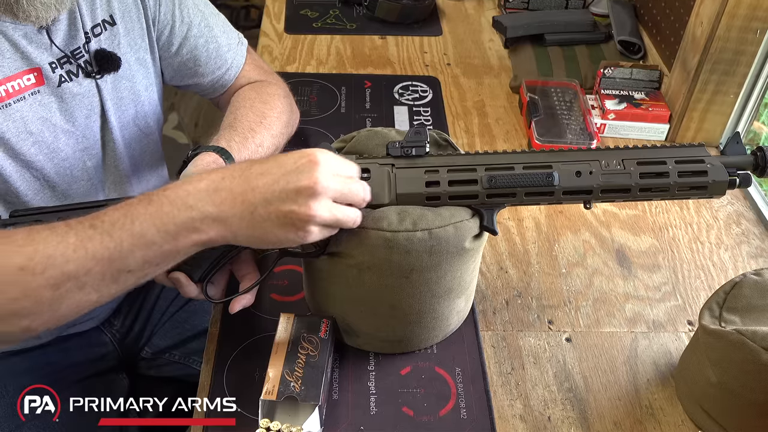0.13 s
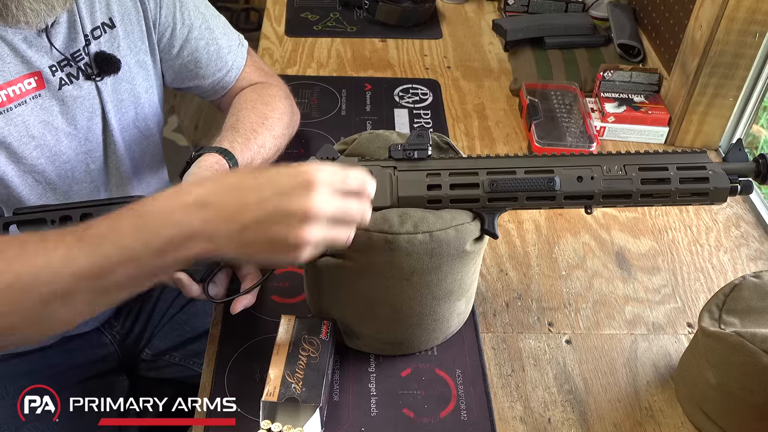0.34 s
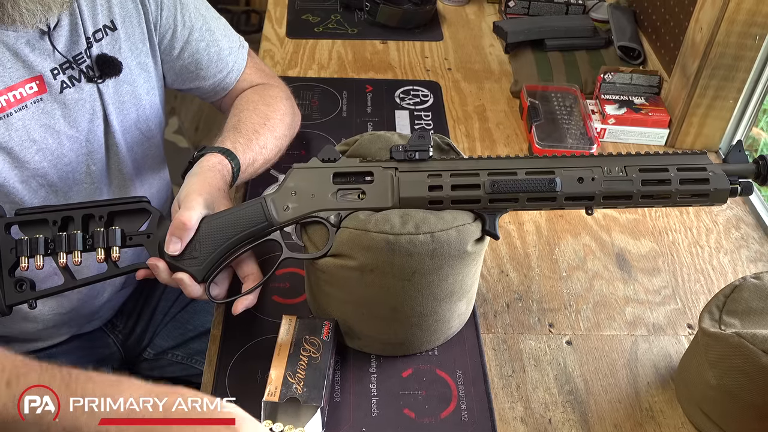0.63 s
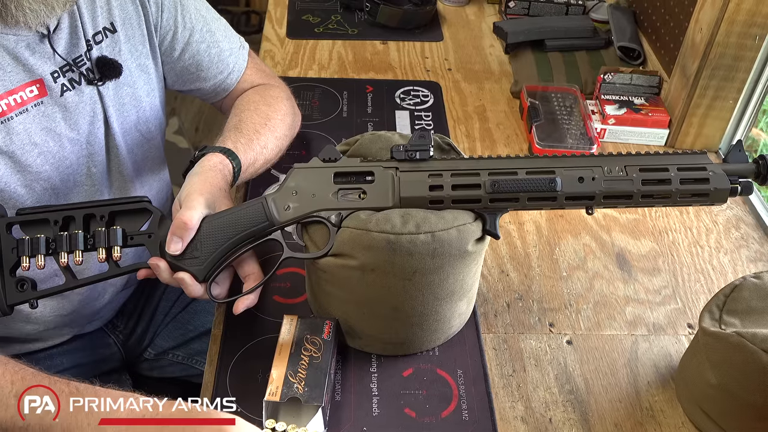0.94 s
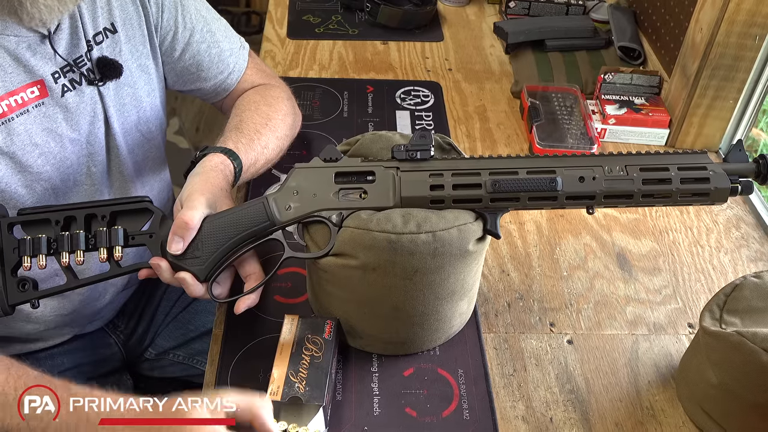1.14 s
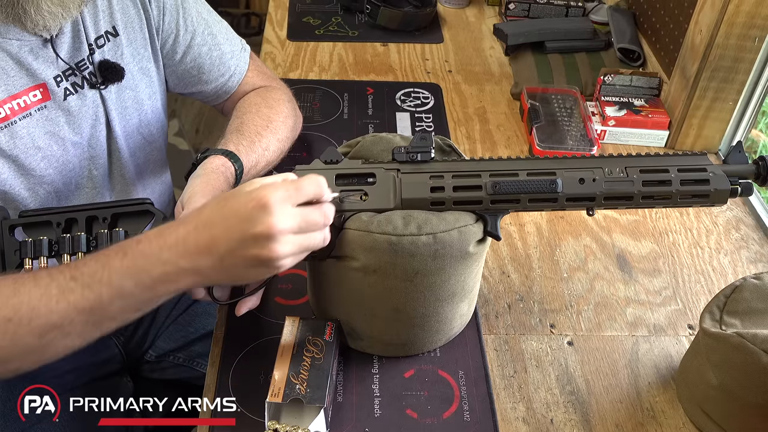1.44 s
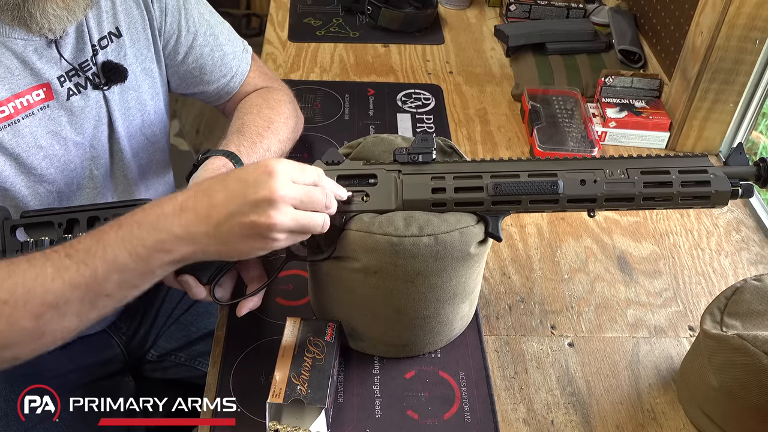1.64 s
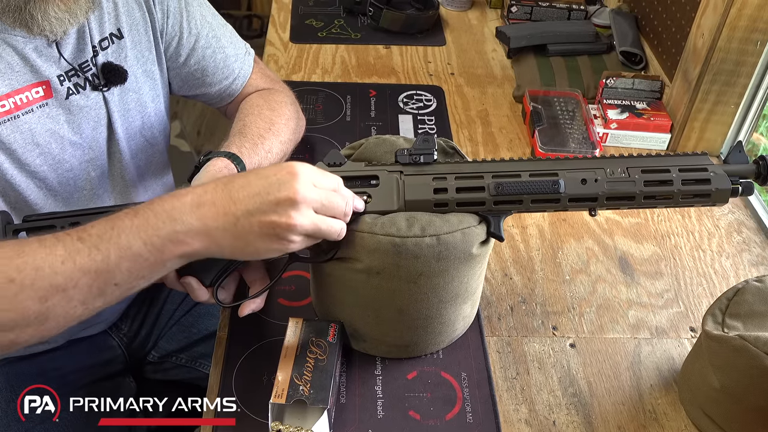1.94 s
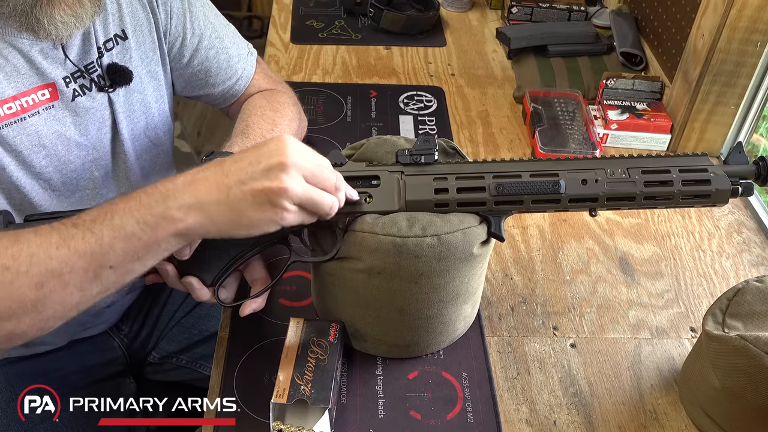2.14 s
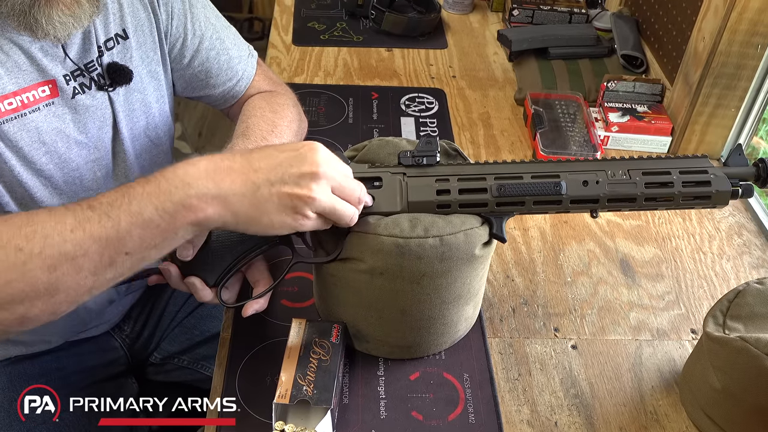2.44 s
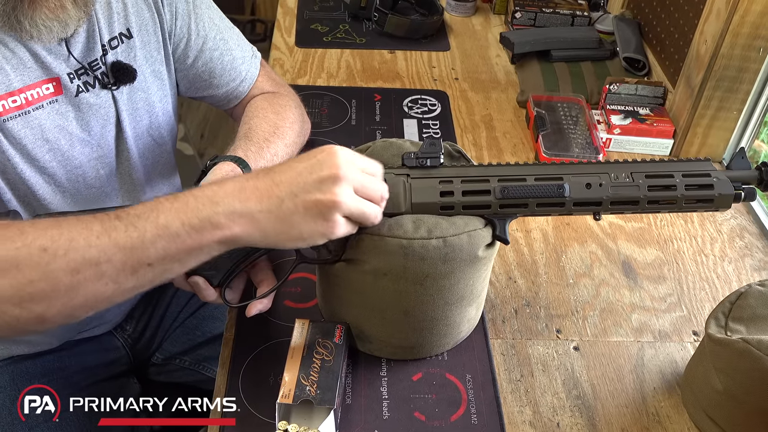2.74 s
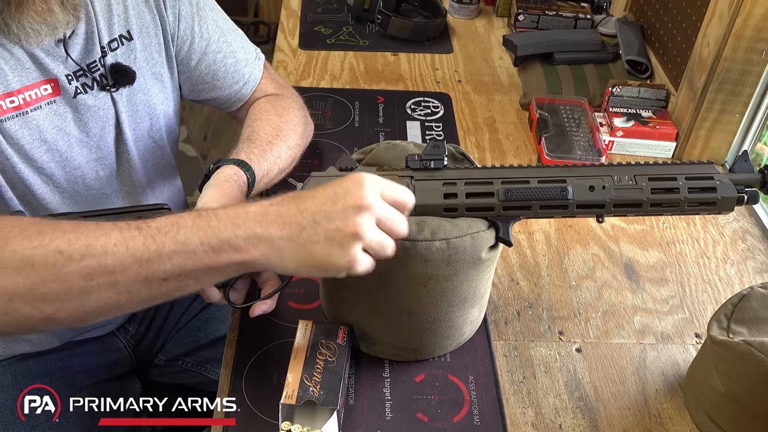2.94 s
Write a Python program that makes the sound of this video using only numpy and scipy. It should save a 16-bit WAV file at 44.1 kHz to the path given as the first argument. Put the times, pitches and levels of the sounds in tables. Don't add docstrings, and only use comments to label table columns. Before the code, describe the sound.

Sharp metallic clicks of cartridges being pushed into a rifle, with light scrapes and box rattles.

```python
import sys
import numpy as np
from scipy import signal
from scipy.fft import rfft, irfft, next_fast_len
from scipy.io import wavfile
from scipy.ndimage import uniform_filter1d, map_coordinates

SR = 44100
rng = np.random.default_rng(int(sys.argv[2]) if len(sys.argv) > 2 else 0)


def output_pcm(signal):
    pcm = np.clip(np.atleast_2d(signal).T, -1, 1) * 32767
    wavfile.write(sys.argv[1], SR, np.round(pcm).astype(np.int16))


def attenuation_scalar(level_db):
    decades = np.asarray(level_db, float) / 20
    return 10 ** decades


N = 136710


def unit(x):
    return x / np.sqrt(np.mean(x ** 2) + 1e-20)


def along(points, hz):
    f, v = np.transpose(points)
    return np.interp(np.log(hz + 1), np.log(f + 1), v)


def wobble(rate):
    knots = rng.standard_normal(int(N * rate / SR) + 4)
    return map_coordinates(knots, [np.arange(N) * rate / SR])


def filtered(x, response):
    m = next_fast_len(len(x) + 8192)
    return irfft(rfft(x, m) * response(np.fft.rfftfreq(m, 1 / SR)), m)[:len(x)]


def body(modes):
    def response(f):
        total = 0
        for k, (hz, width, db) in enumerate(modes):
            total = total + (-1) ** k * attenuation_scalar(db) * 1j * f * width / (hz * hz - f * f + 1j * f * width)
        return total
    return response


def add(track, s, sound):
    part = track[round(s * SR):][:len(sound)]
    part += sound[:len(part)]


def ring(t, hz, t60, rise):
    return np.sin(2 * np.pi * hz * t) * attenuation_scalar(-60 * t / t60) * (1 - np.exp(-t / rise))


def slips(count):
    rate_per_s, spread_db = 2500, 3.5
    happens, sign, size = rng.random((3, count))
    return (happens < rate_per_s / SR) * np.sign(sign - 0.5) * attenuation_scalar(-spread_db * np.log(size + 0.03))


def burst(t, t60, response):
    noise = rng.standard_normal(len(t)) + slips(len(t))
    envelope = attenuation_scalar(-60 * t / max(t60, 0.004)) * (1 - np.exp(-t / 0.00067))
    return filtered(noise * envelope, response) / np.std(filtered(noise, response))


def in_shed(sound):
    # frequency in Hz, t60 in seconds.
    wall_decay = [(200, 0.17), (4000, 0.24), (16000, 0.21)]
    wall_db, delay_s = -7, 0.003
    hz, t, z = signal.stft(rng.standard_normal(SR // 4), SR, nperseg=256)
    tail = signal.istft(z * attenuation_scalar(-60 * t / along(wall_decay, hz)[:, None]), SR, nperseg=256)[1]
    delayed = np.pad(sound, (round(delay_s * SR), 0))
    wet = signal.fftconvolve(delayed, attenuation_scalar(wall_db) * tail / np.linalg.norm(tail))
    return wet + np.pad(sound, (0, len(wet) - len(sound)))


def clicks(rows, low, high):
    ring_cycles, rise_cycles = 8, 0.6
    rattle_db, treble_offset_db, treble_faster, dull_hz = -7, -1.5, 0.44, 5100
    brush_db, brush_t60_s = -18.5, 0.007
    out, t = np.zeros(N), np.arange(SR // 8) / SR

    def scatter(modes):
        return [(hz, width, db + rng.normal(0, 2)) for hz, width, db in modes]

    for s, db, hz, treble_db, t60 in rows:
        shell, thin = body(scatter(low)), body(scatter(high))
        tone = 2.17 * ring(t, hz, ring_cycles / hz, rise_cycles / hz)
        rattle = attenuation_scalar(rattle_db) * burst(t, t60, lambda f: shell(f) / (1 + 1j * f / dull_hz))
        treble = attenuation_scalar(treble_db + treble_offset_db) * burst(
            t, t60 * treble_faster, lambda f: thin(f) * 1j * f / dull_hz / (1 + 1j * f / dull_hz) ** 2)
        add(out, s, in_shed(attenuation_scalar(db) * (tone + rattle + treble)))
        brush = burst(t[:SR // 40], brush_t60_s, shell)[::-1]
        add(out, s - 1 / 40, attenuation_scalar(db + brush_db) * brush)
    return out


def rifle():
    # start in seconds, peak in dB, ring in Hz, treble over it
    # in dB, rattle t60 in seconds.
    rifle_clicks = [(0.0408, -40, 2900, -26, 0.02), (0.0603, -38, 3700, -12, 0.02),
                    (0.091, -43.5, 3010, -21, 0.18), (0.133, -39.5, 2840, -40, 0.03),
                    (0.1975, -38, 3000, -25, 0.02), (0.2495, -28.5, 4340, -12, 0.022),
                    (1.5238, -22, 3620, -21, 0.0076), (1.5308, -28.5, 4430, -10.5, 0.057),
                    (1.672, -57, 1930, -26, 0.015), (1.697, -61, 3000, -20, 0.013),
                    (2.183, -58, 2780, -30, 0.068), (1.788, -54, 1390, -27, 0.017),
                    (1.9948, -41.5, 1780, -37, 0.033), (2.1905, -39, 3520, -14, 0.039),
                    (2.398, -35, 1730, -13.5, 0.042), (2.416, -35.5, 2480, -19, 0.029),
                   (2.4664, -34.5, 3700, -47, 0.021), (2.598, -52, 2200, -33, 0.047),
                   (2.614, -50.5, 3680, -12, 0.055), (2.689, -42, 3700, -31, 0.099),
                   (2.714, -30, 3380, -11.5, 0.055), (2.7215, -24.5, 4100, -8, 0.029),
                   (2.729, -33.5, 3000, -7, 0.02), (2.7819, -36.5, 2880, -17, 0.054),
                   (2.975, -52, 1420, -32, 0.084), (3.011, -56, 1320, -32, 0.054)]
    gate_snaps = [
        (0.3294, -36, 2500, -9, 0.075),
        (0.335, -24.5, 1410, 1.5, 0.032),
        (0.3442, -17, 3020, -4, 0.013),
        (0.3489, -24.5, 4370, -12, 0.025),
        (1.9324, -30.5, 1700, -19.5, 0.029),
        (2.386, -58, 2500, -23, 0.12),
        (2.392, -49, 2500, -5.5, 0.1),
        (3.062, -51.5, 5040, -39, 0.16),
    ]
    slide_clicks = [(0.053, -39, 2900, -22, 0.028), (0.0634, -32.5, 4440, -25, 0.014),
                    (.2041, -41.5, 4400, -25, 0.028), (.2126, -34, 4460, -25, .026),
                    (0.2314, -36, 3010, -22, 0.038), (0.2544, -39, 3020, -15, .031),
                    (0.259, -36, 4450, -11, .036), (2.4204, -39.5, 2500, -25, .021),
                    (2.6481, -53, 1490, -30, .021), (2.6571, -55, 1600, -30, .021),
                    (2.6711, -51, 3140, -25, .051), (2.7855, -38, 3000, -21, 0.045),
                    (2.8247, -49, 3000, -12, .031)]
    # frequency in Hz, width in Hz, level in dB.
    rifle_modes = [(537, 306, 2.5), (1320, 246, 7), (1700, 410, 7), (2250, 560, 6.5), (3010, 600, 11.5),
                   (3780, 340, 9), (4270, 250, 10.5), (5280, 460, 4), (6170, 1220, 0)]
    thin_steel_modes = [(7470, 2700, -2.5), (9340, 1700, 0), (11500, 1700, -2.5), (13900, 1900, -20)]
    damped = [(hz, width * 1.11, db) for hz, width, db in rifle_modes]
    return clicks([*rifle_clicks, *gate_snaps, *slide_clicks], damped, thin_steel_modes)


def slide(rows):
    # frequency in Hz, width in Hz, level in dB.
    tube_modes = [(1700, 1100, -4), (2500, 240, 0.5), (3020, 340, -4), (3700, 120, 5), (4340, 320, 0),
                  (6190, 560, -5)]
    skin_modes = [(6800, 640, -10), (10070, 1250, -2.5), (12240, 710, 0.5), (14300, 2900, -11)]
    s, scrape_db, hiss_db = np.transpose(rows)

    def level(db):
        return attenuation_scalar(np.interp(np.arange(N) / SR, s, db, left=-130, right=-130))

    scrape = unit(filtered(slips(N), body(tube_modes)))
    scrape = scrape * attenuation_scalar(3.5 * wobble(60) + 2.5 * wobble(250))
    hiss = unit(filtered(rng.standard_normal(N) + slips(N), body(skin_modes)))
    hiss = hiss * attenuation_scalar(2.5 * wobble(45) + 2 * wobble(200))
    return in_shed(level(scrape_db) * scrape + level(hiss_db + 0.5) * hiss)[:N]


def cartridge_slides():
    # time in seconds, scrape in dB, thumb hiss in dB.
    first_slide = [
        (.05, -63, -82),
        (.057, -55, -61),
        (.11, -62, -65.5),
        (.19, -60.5, -61.5),
        (.205, -51.5, -61),
        (.228, -55, -61),
        (.262, -50.5, -54),
        (.28, -64.5, -74),
        (.325, -69, -80),
    ]
    last_slide = [
        (2.6, -75, -89),
        (2.615, -59.5, -62.5),
        (2.66, -82, -98),
        (2.672, -64.5, -66),
        (2.73, -56.5, -60.5),
        (2.845, -60.5, -64.5),
        (2.87, -60.5, -58.5),
        (2.9, -64.5, -79),
        (2.96, -80, -95),
    ]
    return slide(first_slide) + slide(last_slide)


def pings():
    # start in seconds, peak in dB, pitch in Hz, t60 in seconds.
    ringing_parts = [(.204, -46, 4420, .07), (.2555, -44, 4450, .05), (.335, -29, 7500, .02),
                     (.335, -31, 11300, .018), (.342, -39, 525, .07), (.3435, -28, 1400, .015),
                     (.3435, -26, 4850, .006), (.3472, -29, 3020, .012), (.702, -43, 1850, .025),
                     (.703, -50, 750, .04), (.79, -52, 680, .04), (.822, -58, 8000, .02),
                     (.919, -52, 7600, .03), (.9877, -42, 1890, .03), (1.104, -55, 4200, .02),
                     (1.1465, -42, 900, .03), (1.5262, -40, 3600, .03), (1.531, -33, 1650, .025),
                     (1.531, -37, 9400, .015), (1.532, -39, 540, .07), (1.9328, -39, 1290, .03),
                     (1.9365, -40, 3000, .035), (1.995, -46, 2700, .012), (2.191, -48, 1200, .04),
                     (2.191, -48, 5800, .015), (2.192, -46, 3000, .04), (2.7225, -33, 4300, .03),
                     (2.976, -48, 3500, .005), (3.0635, -50, 4800, .012)]
    out, t = np.zeros(N), np.arange(SR // 16) / SR
    for s, db, hz, t60 in ringing_parts:
        add(out, s, attenuation_scalar(db) * ring(t, hz, t60, 0.00051))
    return out


def gate_spring():
    t = np.arange(SR // 2) / SR
    fade = np.clip((0.115 - t) / 0.04, 0, 1)
    out = np.zeros(N)
    add(out, 2.84, attenuation_scalar(-71 + 1.9 * wobble(90)[:len(t)]) * np.sin(2 * np.pi * 6300 * t) * fade)
    return out


def cartridge_box():
    # start in seconds, peak in dB, ring in Hz, treble over it in dB, rattle t60 in seconds.
    box_clicks = [(0.696, -42.5, 1620, -21, 0.062), (0.702, -35.5, 1600, -29, 0.06),
                  (0.758, -37, 1630, -26, 0.036), (0.79, -44, 686, -35, 0.047),
                  (0.821, -53, 840, -13.5, 0.21), (0.919, -59, 620, 6.5, 0.17),
                  (0.952, -49, 1890, -11, 0.059), (0.971, -47, 1890, -5, 0.022),
                  (1.011, -48.5, 665, 2.5, 0.12), (1.021, -48.5, 704, 3.5, 0.04),
                  (1.028, -42.5, 710, -29, 0.08), (1.105, -46.5, 1880, -13, 0.052),
                  (1.146, -29.5, 1560, -25, 0.043)]
    # frequency in Hz, width in Hz, level in dB.
    box_modes = [(269, 148, -0.5), (763, 340, -5), (1244, 134, -6), (1890, 140, -3), (2900, 1430, -17)]
    brass_modes = [(6800, 8100, -4.5), (11600, 930, 7.5), (13200, 760, -0.5)]
    return clicks(box_clicks, box_modes, brass_modes)


def bench_thumps():
    # start in seconds, peak in dB.
    pushes = [(0.063, -57), (0.131, -57), (0.198, -58.5), (0.252, -61.5), (0.342, -56), (0.706, -60.5),
              (1.933, -50), (2.248, -65.5), (2.396, -54), (2.603, -52.5), (2.672, -56.5), (2.723, -48),
              (2.787, -49), (2.842, -52)]
    # frequency in Hz, level in dB, t60 in seconds.
    bench_modes = [(98.4, 13, 0.21), (149.8, -4, 0.22)]
    thud_db, thud_t60_s, thud_hz = -6.5, 0.2, 257
    out, t = np.zeros(N), np.arange(SR // 2) / SR
    wood = body([(thud_hz, thud_hz, 0)])
    for s, db in pushes:
        add(out, s, sum(attenuation_scalar(db + level) * ring(t, hz, t60, 0.004) for hz, level, t60 in bench_modes))
        add(out, s, attenuation_scalar(db + thud_db) * burst(t, thud_t60_s, lambda f: wood(f) ** 2))
    return out


def knocks():
    # start in seconds, level in dB, pitch in Hz, t60 in seconds.
    struck_parts = [(.347, -52.5, 226, 0.14), (.7091, -64.5, 10900, 0.049), (0.7264, -65.5, 11000, 0.06),
                    (.9421, -59, 10000, 0.037), (.9461, -63, 5300, 0.029), (1.022, -60, 650, 0.07),
                    (1.156, -57.5, 2290, 0.2), (1.1627, -59.5, 8900, 0.071), (1.9312, -44, 3000, 0.025),
                    (2.831, -63.5, 483, 0.45), (3.051, -49, 240, 0.13), (3.056, -57.5, 416, 0.075),
                    (3.0831, -58, 12001, 0.13), (3.0858, -50.5, 5900, 0.052)]
    out, t = np.zeros(N), np.arange(SR // 2) / SR
    for s, db, hz, t60 in struck_parts:
        part = body([(hz, 0.23 * hz, 0)])
        add(out, s, attenuation_scalar(db) * burst(t, t60, lambda f: part(f) ** 2))
    return out


def bird():
    # start in seconds, level in dB, glide in Hz.
    chirps = [
        (.522, -69.5, -250),
        (.645, -83, -150),
        (1.475, -81, 255),
        (1.845, -78, 0),
    ]
    chirp_s, chirp_hz = 0.023, 3800
    out, u = np.zeros(N), np.linspace(0, 1, round(chirp_s * SR))
    for s, db, glide_hz in chirps:
        phase = 2 * np.pi * np.cumsum(chirp_hz + glide_hz * (u - 0.5)) / SR
        add(out, s, attenuation_scalar(db) * np.sin(np.pi * u) * np.sin(phase))
    return out


def machine_hum():
    # time in seconds, level in dB.
    hum_level = [(0, -54), (.9, -58), (1.3, -61), (3.1, -60)]
    hum_hz, waver_db = 72.5, -3.5
    t = np.arange(N) / SR
    level = np.sqrt(2) * attenuation_scalar(np.interp(t, *np.transpose(hum_level)) + waver_db * wobble(8.4))
    return level * np.sin(2 * np.pi * hum_hz * t + 1.33 * wobble(3.27))


def air():
    # frequency in Hz, level in dB per Hz.
    air_spectrum = [(33, -16), (50, 0), (100, -1.5), (140, -8.5), (486, -19), (1200, -29.5), (4200, -29),
                    (5500, -35.5), (16000, -39.5)]
    air_db, patchy_db = -65, 2
    z = signal.stft(rng.standard_normal(N), nperseg=512)[2]
    patches = uniform_filter1d(uniform_filter1d(rng.standard_normal(z.shape), 6, 0), 14, 1)
    noise = signal.istft(z * attenuation_scalar(patchy_db * unit(patches)), nperseg=512)[1][:N]
    return attenuation_scalar(air_db) * unit(filtered(noise, lambda hz: attenuation_scalar(along(air_spectrum, hz))))


def scene():
    loading = rifle() + cartridge_slides() + pings() + gate_spring()
    on_bench = cartridge_box() + bench_thumps() + knocks()
    surroundings = bird() + machine_hum() + air()
    return (loading + on_bench + surroundings)[None]


def band_limit(x):
    return signal.sosfilt(signal.butter(12, 16430, fs=SR, output="sos"), x)


def record(dry):
    mix = filtered(dry[0], lambda hz: hz < 16200)[None]
    return band_limit(mix)


dry = scene()
out = record(dry)
output_pcm(out)
```